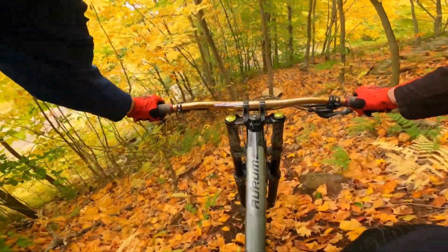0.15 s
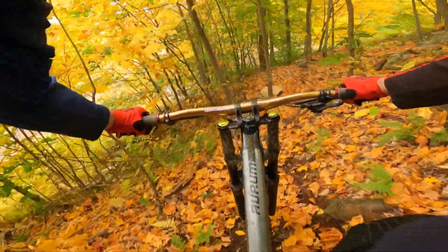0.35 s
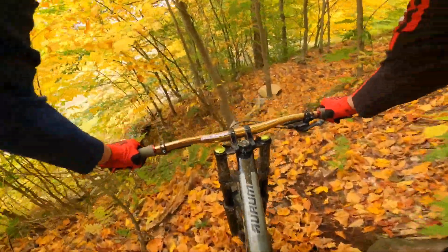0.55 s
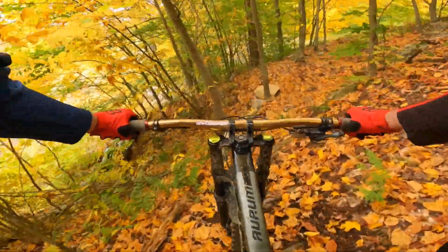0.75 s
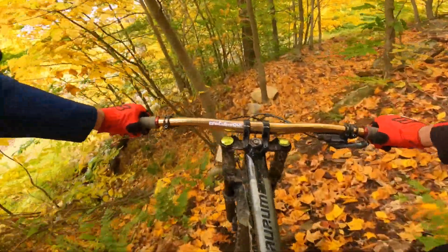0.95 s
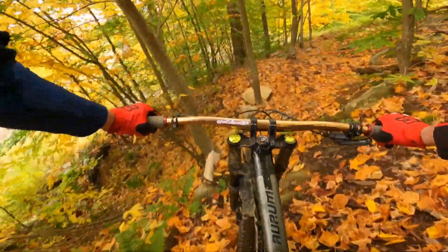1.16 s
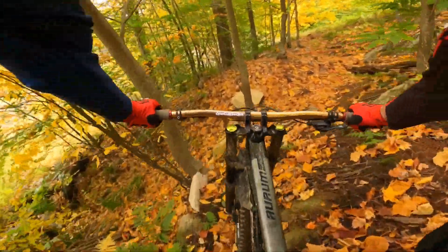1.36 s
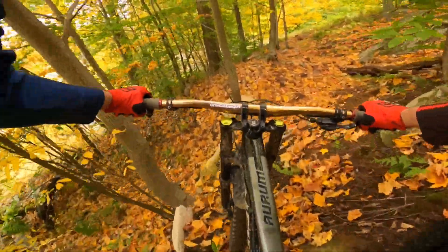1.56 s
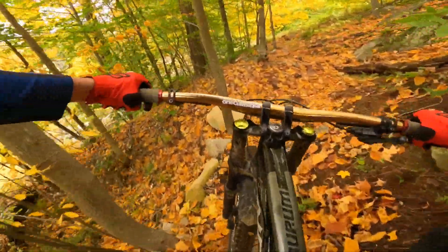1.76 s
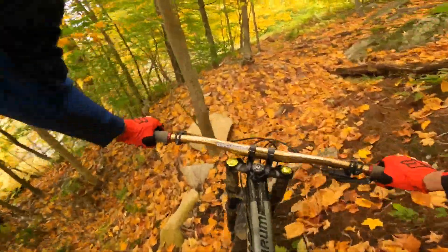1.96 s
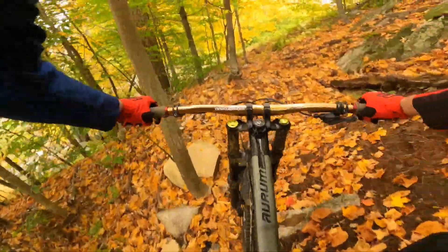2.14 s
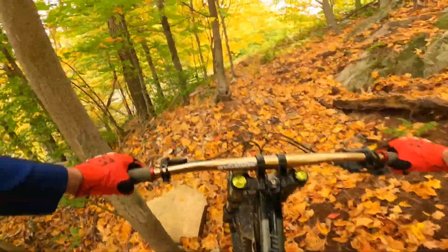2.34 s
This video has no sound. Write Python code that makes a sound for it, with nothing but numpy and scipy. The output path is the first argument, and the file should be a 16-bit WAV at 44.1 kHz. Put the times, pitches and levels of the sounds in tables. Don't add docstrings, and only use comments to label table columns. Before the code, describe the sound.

Mountain bike rides through dry leaves on a forest trail, crackling over low tyre rumble; bumps thump the tyres, shudder the frame and knock a hollow plastic mount, heard close from a chest-worn camera.

```python
import sys
import numpy as np
from scipy import signal
from scipy.fft import rfft, irfft, next_fast_len
from scipy.io import wavfile
from scipy.ndimage import uniform_filter1d, map_coordinates

SR = 44100
rng = np.random.default_rng(int(sys.argv[2]) if len(sys.argv) > 2 else 0)


def makeup_ratio(level_db):
    decades = np.asarray(level_db, float) / 20
    return 10 ** decades


def transcribe(signal):
    frames = np.atleast_2d(signal).T
    limited = np.clip(frames, -1, 1)
    pcm = np.round(limited * 32767).astype(np.int16)
    wavfile.write(sys.argv[1], SR, pcm)


N = 110117
T = np.arange(N) / SR


def unit(x):
    return x / np.sqrt(np.mean(x ** 2) + 1e-20)


def along(points, hz):
    f, v = np.transpose(points)
    return np.interp(np.log(hz + 1), np.log(f + 1), v)


def wobble(rate_hz):
    knots = rng.standard_normal(int(N * rate_hz / SR) + 4)
    return map_coordinates(knots, [T * rate_hz])


def filtered(x, response):
    m = next_fast_len(N + SR // 4)
    return irfft(rfft(x, m) * response(np.fft.rfftfreq(m, 1 / SR)), m)[..., :N]


def coloured(x, spectrum):
    return unit(filtered(x, lambda hz: makeup_ratio(along(spectrum, hz))))


def noise(spectrum):
    return coloured(rng.standard_normal(N), spectrum)


def bump(centre_s, length_s, fall=1):
    u = (T - centre_s) / (0.77 * length_s)
    u = np.where(u > 0, u / fall, u)
    return np.cos(np.pi / 2 * np.clip(u, -1, 1)) ** 2


def effort(rows, fall=1):
    return np.sqrt(sum((makeup_ratio(r[2]) * bump(r[0], r[1], fall)) ** 2 for r in rows))


def ticks(rate_hz, spread_db):
    hits = rng.random(N) < rate_hz / SR
    size = makeup_ratio(spread_db * np.minimum(rng.exponential(1, N), 3))
    return hits * size * rng.choice([-1, 1], N)


# (centre [s], length [s], rustle [dB], rumble [dB])
LULL_ROWS = [
    (0.087, 0.066, 0.5, -2),
    (0.176, 0.054, 1.5, -9),
    (0.518, 0.097, -1.5, 3),
    (.83, 0.14, -1, -2),
    (1.09, .12, -1, 0),
    (1.345, 0.096, 1, -2.5),
    (1.516, 0.29, -1, 2.5),
    (1.916, .1, -4, -10),
    (2.398, 0.035, -4, -3),
]


def lull(column):
    return makeup_ratio(sum(r[column] * bump(r[0], r[1]) for r in LULL_ROWS))


def crackle(spectrum, grain_share):
    cracks = ticks(rate_hz=5000, spread_db=2.5)
    z = signal.stft(rng.standard_normal(N), nperseg=256)[2]
    patches = uniform_filter1d(rng.standard_normal(z.shape), size=6, axis=0)
    patches = uniform_filter1d(patches, size=5, axis=1)
    rustle = signal.istft(z * makeup_ratio(3.95 * unit(patches)), nperseg=256)[1][:N]
    mix = np.sqrt(grain_share) * unit(cracks) + np.sqrt(1 - grain_share) * unit(rustle)
    return coloured(mix, spectrum)


# (centre [s], length [s], level [dB])
LEAF_SWELLS = [(0, 0.084, -29.5), (.24, 0.36, -34.5), (.285, 0.013, -32.5), (.35, 0.027, -32),
               (.39, 0.066, -38), (.625, 0.074, -30.5), (.68, 0.21, -33.5), (.83, 0.18, -35),
               (.95, 0.11, -31.5), (.992, 0.028, -28.5), (1.158, 0.034, -30), (1.207, 0.059, -30),
               (1.26, 0.2, -39), (1.4, 0.1, -33.5), (1.435, 0.062, -31.5), (1.645, 0.11, -33),
               (1.695, 0.047, -31.5), (1.725, 0.054, -27.5), (1.81, 0.061, -32.5), (1.87, 0.071, -41.5),
               (1.978, 0.045, -32.5), (2.01, 0.045, -30), (2.075, 0.13, -25.5), (2.16, 0.14, -29),
               (2.205, 0.039, -44), (2.3, 0.31, -39.5), (2.445, 0.024, -31), (2.468, 0.073, -27.5)]
# (frequency [Hz], density [dB per Hz])
CRUNCH_SPECTRUM = [(240, -5.5), (400, -15), (602, -19.5), (935, -7.5), (1350, -10.5), (7350, -14),
                   (11800, -25), (13800, -35.5), (15000, -62)]
# (frequency [Hz], density [dB per Hz])
BED_SPECTRUM = [(240, -53), (400, -6), (978, -2), (1910, -6), (7130, -12), (12100, -19.5), (13500, -29),
                (15000, -74)]


def leaves():
    bed_db, fizz_hz, fizz_full_db = -36, 8100, -21
    crunch = effort(LEAF_SWELLS, 1.23) * makeup_ratio(1.3 * wobble(90)) * crackle(CRUNCH_SPECTRUM, 0.64)
    treble = filtered(crunch, lambda hz: 1 / (1 + (fizz_hz / (hz + 1)) ** 8))
    fizz = effort(LEAF_SWELLS) / makeup_ratio(fizz_full_db) * treble
    bed = lull(column=2) * makeup_ratio(bed_db + 0.29 * wobble(6.9)) * crackle(BED_SPECTRUM, 0.41)
    return crunch + fizz + bed


def swings(rows, overtone_db, wander):
    overtone_full_hz = 125
    out = np.zeros(N)
    phases = rng.normal(0, 0.56, 40)
    drift_s = np.cumsum(1 + wander * wobble(30)) / SR
    for (centre_s, length_s, db, hz), phase in zip(rows, phases):
        turn = 2 * np.pi * hz * (drift_s - np.interp(centre_s, T, drift_s))
        overtone = makeup_ratio(overtone_db) * min(1, overtone_full_hz / hz) ** 2
        cycle = np.cos(turn) + overtone * np.cos(2 * turn + phase)
        out += makeup_ratio(db + 3) * bump(centre_s, length_s) * cycle
    return out


# (centre [s], length [s], level [dB], pitch [Hz])
TYRE_THUMPS = [(.02, 0.089, -19, 43.5), (.195, 0.05, -25, 35), (.25, 0.091, -25, 54.3),
               (.322, 0.1, -22, 48.6), (.64, 0.086, -22.5, 42.6), (.7, 0.03, -26, 60.4),
               (.1, 0.038, -26, 44.7), (.9, 0.056, -35, 39), (.975, 0.038, -28, 69.6),
               (1.033, 0.043, -24.5, 51), (1.012, 0.054, -17, 53.6), (1.16, 0.025, -21, 60),
               (1.225, 0.059, -20.5, 50.4), (1.46, 0.056, -26.5, 55), (1.52, .03, -28.5, 60),
               (1.605, 0.014, -41, 35), (1.66, 0.022, -27.5, 71), (1.73, 0.08, -26.5, 40),
               (1.865, 0.054, -30.5, 45), (1.926, 0.023, -21, 45), (1.96, 0.075, -23.5, 42),
               (2.03, 0.076, -28.5, 39.6), (2.085, 0.043, -25, 60), (2.245, 0.039, -23, 35),
               (2.305, .05, -39, 30.2), (2.405, 0.054, -25.5, 44.5), (2.467, 0.057, -20.5, 41)]


def thumps():
    return swings(TYRE_THUMPS, overtone_db=-7.5, wander=0.14)


# (frequency [Hz], density [dB per Hz])
ROLL_SPECTRUM = [(12, -32), (20, -5), (60, -0.5), (97, -10.5), (203, -11.5), (348, -17.5), (500, -21),
                 (650, -28), (1100, -120)]


def rumble():
    roll_db, after_thump_db, wobble_db = -35, -9.5, 1.8
    level = makeup_ratio(roll_db) * lull(column=3) + makeup_ratio(after_thump_db) * effort(TYRE_THUMPS, 1.3)
    return level * makeup_ratio(wobble_db * wobble(12.0)) * noise(ROLL_SPECTRUM)


# (centre [s], length [s], level [dB], pitch [Hz])
FRAME_SHUDDERS = [(.01, 0.057, -19.5, 135.5), (.015, 0.043, -30, 279), (.042, 0.022, -19.5, 183),
                  (.085, 0.1, -33.5, 265), (.19, 0.028, -29.5, 103), (.245, 0.018, -23.5, 287),
                  (.27, 0.048, -22, 189), (.33, 0.04, -30, 130), (.638, 0.061, -16.5, 122),
                  (.632, 0.046, -19.5, 275.5), (.645, 0.076, -29, 193), (.675, 0.03, -21.5, 135),
                  (.975, 0.018, -29, 204), (1.0, 0.027, -24.5, 138), (1.1035, 0.053, -20.5, 125),
                  (1.132, 0.032, -17, 165), (1.125, .06, -25, 271.6), (1.149, 0.015, -14, 209),
                  (1.19, 0.045, -23.5, 143.4), (1.213, 0.016, -22, 289), (1.432, 0.012, -26, 222),
                  (1.464, 0.023, -19.5, 199), (1.518, 0.027, -24.5, 207), (1.64, .03, -38, 177),
                  (1.733, 0.044, -24, 140), (1.73, 0.032, -29, 282), (1.78, 0.054, -30.5, 201),
                  (1.9835, 0.0054, -8.5, 224), (2.02, 0.1, -29.5, 173), (2.07, 0.038, -28.5, 260),
                  (2.22, 0.06, -32.5, 200), (2.21, 0.012, -47, 408), (2.463, 0.014, -21, 226),
                  (2.455, 0.08, -31, 276)]
# (frequency [Hz], density [dB per Hz])
GRIT_SPECTRUM = [(60, -41), (110, -12), (280, -8), (400, -14.5), (520, -11.5), (9000, -86)]


def shudders():
    grit_db = -9
    grit = makeup_ratio(grit_db) * effort(FRAME_SHUDDERS) * noise(GRIT_SPECTRUM)
    return swings(FRAME_SHUDDERS, overtone_db=-6.5, wander=0.026) + grit


# (centre [s], length [s], level [dB], resonance [Hz])
MOUNT_RATTLES = [(0.025, 0.042, -28.5, 1030), (0.238, 0.06, -25, 996), (0.271, 0.092, -29, 1390),
                 (0.37, 0.079, -34, 1460), (0.622, 0.039, -27.5, 1100), (0.955, 0.072, -31.5, 1010),
                 (1.15, 0.2, -30.5, 1020), (1.209, 0.033, -29.5, 1000), (1.432, 0.026, -32, 1130),
                 (1.793, 0.064, -31, 950), (0.998, 0.028, -24.5, 1020), (1.734, 0.033, -21.5, 995),
                 (2.462, 0.076, -28.5, 1020)]


def rattle():
    muffle_hz, width = 3000, 0.24
    taps = ticks(rate_hz=2500, spread_db=3)
    out = np.zeros(N)
    for centre_s, length_s, db, hz in MOUNT_RATTLES:
        def hollow(f):
            resonance = 1j * f / (hz * hz - f * f + 1j * f * hz * width)
            muffle = 1 / (1 + 1j * f / muffle_hz) ** 2
            low_cut = f / (f - 1j * hz)
            return resonance * muffle * low_cut
        out += makeup_ratio(db) * bump(centre_s, length_s) * unit(filtered(taps, hollow))
    return out


# (time [s], peak level [dB], pitch [Hz], t60 [s])
MOUNT_KNOCKS = [(0.046, -8, 1030, 0.021), (0.6475, -10, 960, 0.015), (1.461, -21, 980, 0.035),
                (1.51, -23, 938, 0.062), (1.826, -9, 1025, 0.017), (1.875, -19.5, 1640, 0.016),
                (.603, -19.5, 715, 0.021), (.418, -25.5, 617, 0.028), (1.977, -15.5, 1014, 0.035),
                (1.981, -22.5, 938, 0.067), (2.116, -12.5, 980, 0.019), (.6478, -9.5, 1500, 0.012),
                (1.9822, -14.5, 704, 0.021)]


def knocks():
    knock_db, click_db, click_top_hz, upper_ratio = 1.5, -5.5, 2600, 1.96
    out, t = np.zeros(N + SR), np.arange(SR // 16) / SR
    f = np.fft.rfftfreq(len(t), 1 / SR)
    for s, db, hz, t60_s in MOUNT_KNOCKS:
        upper = np.sin(2 * np.pi * hz * upper_ratio * t + rng.random() * 6)
        ring = np.sin(2 * np.pi * hz * t) + makeup_ratio(-7.5 - 60 * t / 0.011) * upper
        ring = makeup_ratio(-60 * t / t60_s) * (1 - np.exp(-t / 0.00073)) * ring
        spectrum = rfft(rng.standard_normal(len(t))) / (1 + (f / click_top_hz) ** 4)
        click = makeup_ratio(click_db - 60 * t / 0.0017) * 0.28 * unit(irfft(spectrum, len(t)))
        click = (1 - np.exp(-t / 0.00017)) ** 2 * click
        out[round(s * SR):][:len(t)] += makeup_ratio(db + knock_db) * (ring + click)
    return out[:N]


def fractures(rows, broad, t60_s):
    gain_db = -1
    out, t = np.zeros(N + SR), np.arange(SR // 16) / SR
    f = np.fft.rfftfreq(len(t), 1 / SR)
    for s, db, hz, width in rows:
        peak = np.exp(-(np.log((f + 1) / hz) / width) ** 2)
        shape = (broad / (1 + (f / 7500) ** 6) + peak) * (f > 1500)
        tone = unit(irfft(rfft(rng.standard_normal(len(t))) * shape, len(t)))
        envelope = makeup_ratio(db + gain_db - 60 * t / t60_s) * (1 - np.exp(-t / 0.00016))
        out[round(s * SR):][:len(t)] += envelope * tone
    return out[:N]


# (time [s], peak level [dB], pitch [Hz], width [log pitch])
LEAF_CRACKS = [(.0965, -33, 8900, .25), (.1126, -25.5, 4500, .4), (.255, -18.5, 6500, 0.22),
               (0.2756, -19, 4970, .6), (.301, -22.5, 3500, 0.46), (0.3235, -24, 4600, 0.26),
               (.389, -27, 6000, .3), (.425, -19, 1990, 0.24), (1.1447, -25, 4000, 0.48),
               (1.1958, -26, 3500, .5), (1.3032, -19, 2600, 0.18), (1.373, -22, 2200, .2),
               (1.393, -23, 4900, 0.18), (1.5205, -22.5, 4870, .25), (1.6945, -21.5, 5820, 0.34),
               (1.876, -30, 4500, 0.42), (1.906, -29, 5200, 0.23), (1.9629, -26, 6130, .2),
               (2.0168, -19, 4200, 0.22), (2.164, -22, 4500, .3), (2.192, -30, 2500, .4),
               (2.255, -22.5, 3650, .05), (2.435, -27, 6500, .25)]


def leaf_cracks():
    return fractures(LEAF_CRACKS, broad=0.12, t60_s=0.0097)


def hum():
    hum_db, pitch_hz = -34, 118
    return makeup_ratio(hum_db) * bump(0.43, 0.22) * np.sin(2 * np.pi * pitch_hz * T + 1.2 * wobble(21))


# (time [s], peak level [dB], pitch [Hz], width [log pitch])
TWIG_SNAPS = [(0.3417, -10.5, 10100, 0.23), (1.4357, -15.5, 4550, 0.12), (1.6316, -20, 5670, 0.42),
              (1.977, -19, 7060, 0.035), (2.1163, -12.5, 5500, 0.72), (2.4432, -21.5, 4780, 0.34)]


def twig_snaps():
    return fractures(TWIG_SNAPS, broad=0.3, t60_s=0.015)


# (frequency [Hz], correlation [0-1])
PORT_LIKENESS = [(40, .8), (200, .99), (600, .985), (1400, .9), (3200, .8), (4300, .994), (6300, .994),
                 (8500, .9), (13000, .5)]
# (frequency [Hz], level [dB])
LEFT_OVER_RIGHT = [(40, -2), (150, 0), (500, 1.2), (1300, 3.5), (3000, 0), (6500, 0), (9000, 2.8),
                   (13000, 1.5)]
# (frequency [Hz], phase [rad])
LEFT_LEAD = [(700, 0), (1210, -.8), (2200, -.7), (3900, 0)]


def ports(x):
    z = signal.stft(x, nperseg=512)[2]
    scatter = signal.istft(z * np.exp(2j * np.pi * rng.random(z.shape)), nperseg=512)[1][:N]
    scatter = np.roll(unit(scatter) * np.std(x), SR // 250)

    def split(hz):
        angle = np.arccos(along(PORT_LIKENESS, hz)) / 2
        return np.array([np.cos(angle), np.sin(angle)])

    def skew(hz):
        left = makeup_ratio(along(LEFT_OVER_RIGHT, hz) / 2) * np.exp(.5j * along(LEFT_LEAD, hz))
        return np.array([left, 1 / left])

    mid, side = filtered(np.array([x, scatter]), split)
    return filtered(np.array([mid + side, mid - side]), skew)


def scene():
    ground = leaves() + thumps() + rumble() + leaf_cracks() + twig_snaps()
    bike = shudders() + rattle() + knocks() + hum()
    return ports(ground + bike)


def top_cut(x):
    return signal.sosfilt(signal.butter(12, 15140, fs=SR, output="sos"), x)


def record(dry):
    low_cut_hz, shelf_hz, shelf_db, top_hz = 16, 7610, -5, 15100

    def response(hz):
        low_cut = hz ** 2 / (hz ** 2 + low_cut_hz ** 2)
        shelf = makeup_ratio(shelf_db / (1 + (shelf_hz / (hz + 1)) ** 40))
        return low_cut * shelf * (hz < top_hz)

    return top_cut(filtered(dry, response))


dry = scene()
out = record(dry)
transcribe(out)
```